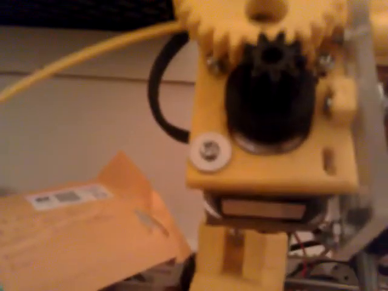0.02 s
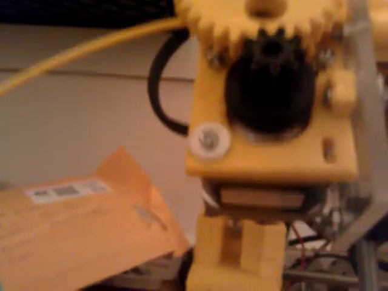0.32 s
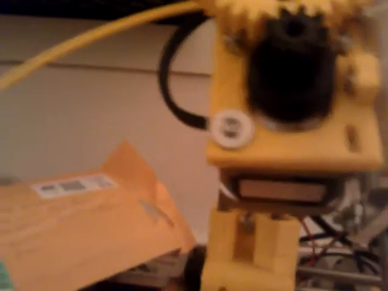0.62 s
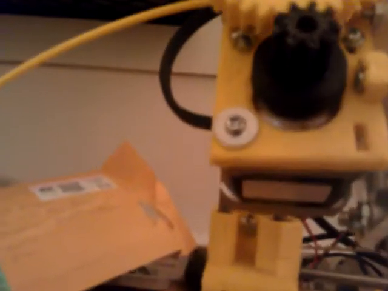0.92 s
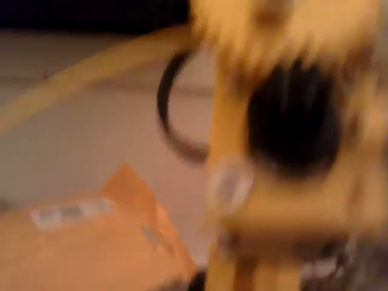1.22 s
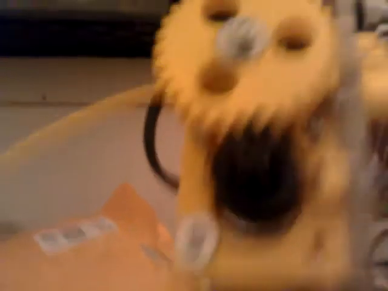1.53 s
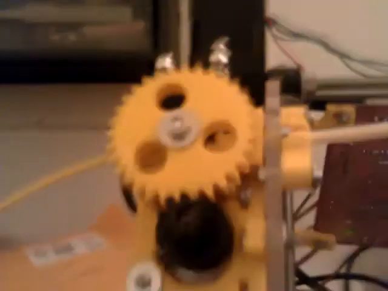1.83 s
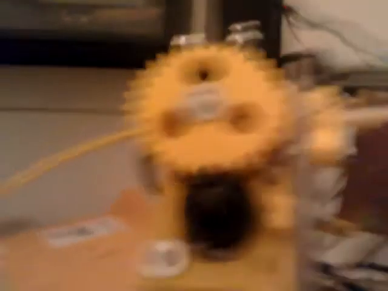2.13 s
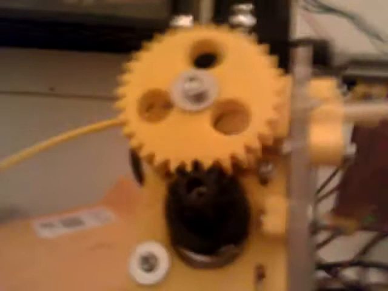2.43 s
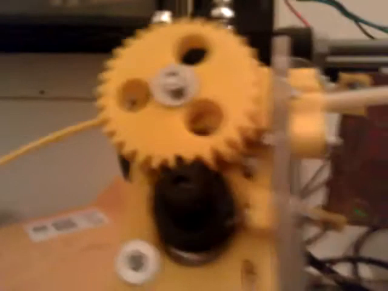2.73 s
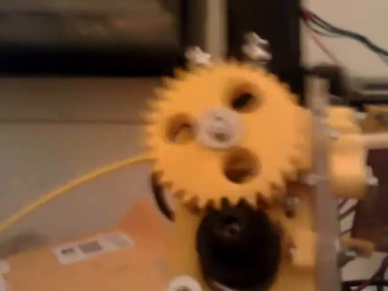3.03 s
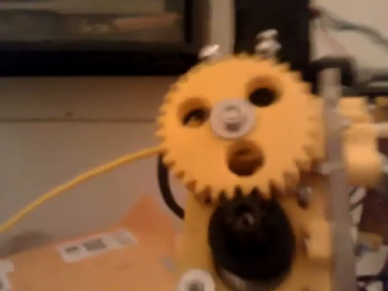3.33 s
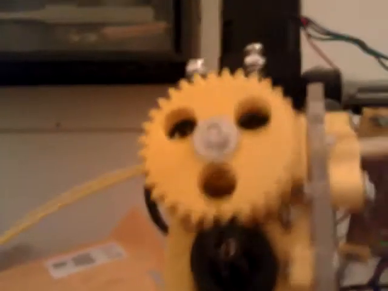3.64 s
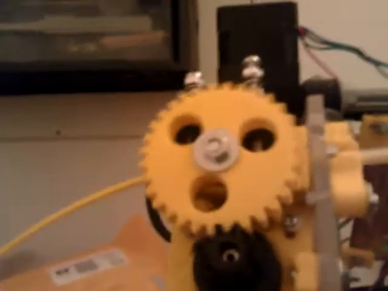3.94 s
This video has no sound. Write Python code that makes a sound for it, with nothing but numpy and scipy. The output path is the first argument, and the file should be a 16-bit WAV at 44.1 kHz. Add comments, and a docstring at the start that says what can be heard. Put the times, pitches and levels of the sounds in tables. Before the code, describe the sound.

A stepper motor hums, slowly turning plastic gears, with sharp clicks and scrapes from handling.

```python
"""A small room, one microphone close to a filament extruder, fan noise and a faint driver whine behind.
A stepper motor starts and slowly turns the printed plastic gears: every step rings the frame and ticks,
and the teeth rub as they mesh. Handling adds dry scrapes and sharp clicks; the hardest thump
and overload the microphone. Near the end it moves from beside the motor round to the big gear."""
import sys
import numpy as np
from scipy import signal
from scipy.fft import rfft, irfft
from scipy.io import wavfile
from scipy.ndimage import uniform_filter1d

SR = 44100
rng = np.random.default_rng(int(sys.argv[2]) if len(sys.argv) > 2 else 0)


def master_out(mix):
    """Clip the mix to full scale and print it as 16-bit PCM to the path in sys.argv[1]."""
    frames = np.transpose(np.atleast_2d(mix))
    ceiling = np.clip(frames, -1, 1)
    pcm = np.round(ceiling * 32767).astype(np.int16)
    wavfile.write(sys.argv[1], SR, pcm)


N = 176400
T = np.arange(N) / SR
MOTOR_START_S, STEPS_PER_S = .643, 39.135

# fan and room air: (frequency [Hz], level [dB])
AIR_COLOUR = [(30,-8),(80,-9),(150,-5.5),(300,19),(500,4),(900,3),(2000,-0.5),(4000,-2.5),(7000,-4),(10000,4),(12500,-10),(14000,-5),(16000,-13)]
# lines of the driver's whine: (frequency [Hz], width [Hz], level [dB], flutter [dB])
WHINE_LINES = [(8370,50,-13,3),(11720,14,-3,2),(11920,90,-3.5,5)]
# gain of the whine: (time [s], level [dB])
WHINE_GAIN = [(0,-53),(1.45,-58),(1.62,-43.5),(2.05,-47),(2.45,-55),(3.1,-59),(3.35,-49.5),(3.6,-49.5),(4.0,-52)]
# handling scrapes: (start [s], attack [s], hold [s], release [s], level [dB], centre [Hz], width [octaves])
SCRAPE_STROKES = [(0.233,0.022,0.021,0.068,-28,4240,0.41),(0.23,0.039,0.011,0.026,-32,2600,1.45),(0.248,0.012,0.015,0.054,-42,447,0.29),(0.449,0.013,0.049,0.014,-44.5,9460,1.3),(0.584,0.014,0.0058,0.013,-45,6750,0.87),(0.991,0.017,0.018,0.017,-40.5,5800,1.9),(1.111,0.005,0.041,0.036,-41.5,4700,0.62),(2.085,0.003,0.077,0.015,-25,10950,0.36),(2.088,0.0052,.05,.012,-39,6600,.25),(2.139,0.015,0.011,0.014,-23,4800,2.5),(2.183,0.011,0.0074,0.02,-22,9200,0.86),(2.28,0.019,0.058,0.022,-26,4670,2.7),(2.283,0.0077,0.021,.01,-30.5,10300,0.23),(2.32,0.012,0.03,0.0093,-19.5,11300,0.32)]
# high modes of the printed parts: (frequency [Hz], level [dB], t60 [s])
PART_MODES = [(1610,-5,.09),(3410,0,.12),(3690,0,.13),(4220,0,.15),(4770,0,.13),(5420,0,.1),(6050,-1,.11),(7850,-1,.12)]
# tail of the room: (frequency [Hz], level [dB])
ROOM_COLOUR = [(120,-4),(400,11.5),(900,2.5),(2000,4.5),(4000,11),(6000,8),(8500,3),(11000,-1),(16000,-19)]
# handling clicks: (time [s], level [dB], decay [s], tilt [dB/octave], room send [dB])
CLICK_EVENTS = [(0.635,-26.5,0.0057,4,-4),(1.114,-29,0.003,-5.5,-19),(1.354,-24.5,0.0018,6.5,-23),(1.635,-15.5,0.0039,-1,4.5),(1.6442,-9,0.0038,-1,-0.5),(1.647,-4.5,0.0049,0.5,-5.5),(1.835,-24.5,0.0068,-3.5,-25),(1.8532,-14.5,0.0038,-1.5,5.5),(1.8578,4,0.0023,1.5,-10),(2.046,-26.5,0.0078,-0.5,-10),(2.0848,-18,.002,12,-25),(2.159,-8.5,0.0018,1,-4),(2.1661,-1.5,0.0019,-0.5,-4),(2.284,-13.5,0.0016,3,-20),(2.3262,-5,0.0011,-5,-21),(2.344,5,0.0006,2.5,-21),(2.3493,0,0.0017,7.5,-22),(2.3562,2,0.0013,-15,-24),(2.4,-32,0.0086,-3,-44),(2.487,-11.5,0.0022,2.5,-1),(2.7242,-24.5,0.015,-7,-16),(2.7376,-19,0.004,7,-8),(2.749,-3,0.003,-0.5,-8.5),(2.926,-27.5,0.0066,-5.5,-22),(3.32,-29,0.007,10.5,-23),(3.581,-30.5,0.004,-15,-28)]
# crack of hard plastic: (frequency [Hz], level [dB])
CRACK_COLOUR = [(150,-6),(400,-0.5),(900,-2),(2000,-2.5),(3000,-4),(4200,1),(5500,-7.5),(8000,-8),(12000,-13.5),(16000,-12.5)]
# frame hum beside the motor and facing the big gear: (harmonic [x step rate], level [dB])
HUM_AT_MOTOR = [(1, -81), (2, -56), (3, -66), (4, -29), (5, -21.5), (6, -24.5), (7, -2), (8, -6), (9, -9),
                (10, -16.5), (11, -24.5), (12, -18), (13, -22.5), (14, -17.5), (15, -24.5), (16, -31),
                (17, -35), (18, -38), (19, -28.5), (20, -54), (21, -44.5), (22, -30)]
HUM_AT_GEAR = [(1, -54), (2, -68), (3, -42), (4, -43), (5, -19.5), (6, -21), (7, -6.5), (8, 1.5), (9, -6),
               (10, -18.5), (11, -29.5), (12, -11), (13, -16.5), (14, -24), (15, -19), (16, -30), (17, -27),
               (18, -47), (19, -27.5), (20, -59), (21, -79), (22, -29)]
# gains of the hum, step tick, motor case ring and motor hiss: (time [s], level [dB])
HUM_GAIN = [(.65,-35),(.78,-36),(.86,-32.5),(.93,-38),(1.1,-31),(1.18,-38),(1.3,-32),(1.5,-35.5),(1.6,-31),(1.7,-37.5),(1.78,-30.5),(1.9,-39.5),(2.06,-28.5),(2.22,-42),(2.46,-36.5),(2.85,-33.5),(3.17,-29),(3.28,-31.5),(3.37,-30.5),(3.47,-29.5),(3.53,-34),(3.63,-35),(3.77,-27.5),(3.86,-31),(3.92,-31.5),(4.0,-32.5)]
TICK_GAIN = [(.65,-47.5),(1.35,-36.5),(2.0,-32),(2.5,-49),(3.1,-45),(4.0,-42.5)]
CASE_GAIN = [(.65,-40),(1.35,-37.5),(2.0,-36),(2.5,-60)]
HISS_GAIN = [(.63,-52.5),(1.08,-50),(1.14,-48.5),(1.34,-43.5),(1.5,-49.5),(1.8,-40),(2.03,-42.5),(2.13,-52),(2.45,-79),(2.65,-58),(3.0,-64.5),(4.0,-59)]
# spectra of the step tick, motor case ring and motor hiss: (frequency [Hz], level [dB])
TICK_COLOUR = [(2500,-8),(3900,-14.5),(5000,5),(5800,-10),(6280,19.5),(6700,-4),(7600,9.5),(9000,-17),(15000,-12)]
CASE_COLOUR = [(3200,-25),(3850,-1.5),(4300,-13),(4950,1),(5400,-10.5),(5900,-28)]
HISS_COLOUR = [(1500,-4),(2600,2),(3700,12),(4900,10),(6300,12),(8000,4.5),(10000,3.5),(12500,5.5),(15500,-16)]
# rubs of meshing teeth: (time [s], half length [s], level [dB])
TOOTH_RUBS = [(0.642,0.011,-29),(0.693,0.036,-48.5),(0.887,0.025,-33),(1.118,0.0092,-31.5),(1.15,0.029,-32.5),(1.436,0.028,-36.5),(1.626,0.049,-36),(2.048,0.017,-36),(2.595,0.034,-36.5),(2.933,0.027,-32),(3.21,0.085,-43),(3.449,0.038,-36),(3.681,0.014,-30),(3.719,0.036,-31.5),(3.995,0.013,-23)]
# resonances of the gears: (frequency [Hz], level [dB], t60 [s])
GEAR_RESONANCES = [(273,3,0.042),(353,6,0.024),(540,5,0.051),(564,1,0.059),(679,-8,0.085),(857,-4.5,0.041),(1055,-16,0.033),(1340,-14,0.03)]
# low thumps of the hardest clicks: (time [s], peak [dB], contact sharpness [Hz])
THUMP_EVENTS = [(1.6488,-8.5,554),(1.859,-3,445),(2.166,-0.5,330),(2.3261,-6.5,447),(2.3573,5,1210),(2.4885,-1,480),(2.7414,-18,403),(2.7495,0,390)]


def from_db(db):
    """Decibels to gain."""
    return 10 ** (np.asarray(db) / 20)


def unit_rms(x):
    """Scale to unit rms."""
    return x / np.sqrt(np.mean(x ** 2) + 1e-20)


def fader(points):
    """Gain through (time [s], level [dB]) points."""
    return from_db(np.interp(T, *np.transpose(points)))


def octaves(size):
    """Frequency bins in octaves above 1 Hz."""
    return np.log2(np.maximum(np.arange(size // 2 + 1) * SR / size, 1))


def noise(points, tilt_db=0, size=N):
    """Unit noise coloured by (frequency [Hz], level [dB]) points and a tilt per octave."""
    hz, db = np.transpose(points)
    bins = octaves(size)
    gain = from_db(np.interp(bins, np.log2(hz), db) + tilt_db * np.maximum(bins, np.log2(hz[0])))
    return unit_rms(irfft(rfft(rng.standard_normal(size)) * gain, size))


def drift(per_s):
    """Random wander of unit rms, with per_s turning points a second."""
    return unit_rms(np.interp(T * per_s, np.arange(8000), rng.standard_normal(8000)))


def ring(x, hz, t60):
    """A resonance; a unit click rings at height 1."""
    radius, angle = from_db(-60 / (t60 * SR)), 2 * np.pi * hz / SR
    return signal.lfilter([0, np.sin(angle)], [1, -2 * radius * np.cos(angle), radius ** 2], x + 1e-18)


def butter(x, order, hz, kind):
    """Low-pass or high-pass filter."""
    return signal.sosfilt(signal.butter(order, hz, kind, fs=SR, output="sos"), x)


def add(out, start_s, x):
    """Mix a sound in at its start time."""
    i = int(start_s * SR)
    out[i:i + len(x)] += x[:N - i]


def running():
    """0 at rest, 1 once the motor turns."""
    return np.clip((T - MOTOR_START_S) / .0017, 0, 1)


def room_air(level_db=-52):
    """A steady bed of fan noise and room air."""
    return from_db(level_db) * noise(AIR_COLOUR)


def driver_whine(swell_db=2):
    """The motor driver gives off narrow lines that flutter and swell on every step."""
    lines = np.zeros(N)
    for hz, width, db, flutter_db in WHINE_LINES:
        line = ring(rng.standard_normal(N), hz, t60=np.log(1000) / (np.pi * width))
        lines += from_db(db) * unit_rms(line * from_db(flutter_db * drift(70)))
    pulse = running() * np.cos(2 * np.pi * STEPS_PER_S * (T - MOTOR_START_S))
    return lines * fader(WHINE_GAIN) * from_db(swell_db * pulse)


def scrapes(grain_db=1.5, rasp_db=1.1):
    """Handling makes brief grainy friction, each stroke in its own band."""
    out, t = np.zeros(N), T[:16384]
    for start, attack, hold, release, db, hz, width in SCRAPE_STROKES:
        band = 1 / (1 + np.abs((octaves(len(t)) - np.log2(hz)) / width) ** 2.3)
        friction = unit_rms(irfft(rfft(rng.standard_normal(len(t))) * band))
        rise = np.minimum(t / attack, 1)
        fall = np.exp(-(np.maximum(t - attack - hold, 0) / release) ** 2)
        add(out, start, from_db(db) * friction * rise * fall)
    roughness = from_db(grain_db * drift(600) + rasp_db * drift(230))
    return butter(out * roughness, 4, 13900, "lowpass")


def crackle(friction, slips_per_s=350, relative_db=-18):
    """A scrape catches in tiny slips, as strong as the friction is at that moment."""
    force = np.sqrt(np.abs(uniform_filter1d(friction ** 2, size=256)))
    slips = (rng.random(N) < slips_per_s / SR) * rng.uniform(.17, 1, N) * rng.choice([-1, 1], N)
    return force * unit_rms(ring(slips, hz=4970, t60=.0014)) * from_db(relative_db)


def plastic_ring(contacts, gain_db=-18):
    """The high modes of the printed parts ring on after a contact."""
    return sum((-1) ** k * from_db(db + gain_db) * ring(contacts, hz, t60) / np.sqrt(t60 * SR)
               for k, (hz, db, t60) in enumerate(PART_MODES))


def room_tail(send, t60=.21, delay_s=.00081, gain_db=-3.5, flicker_db=2):
    """Sound energy builds up in the small room and dies away as a diffuse tail."""
    retained = from_db(-120 / (t60 * SR))  # share of the energy left after one sample
    energy = signal.lfilter([1 - retained], [1, -retained], send ** 2 + 1e-18)
    envelope = np.sqrt(np.interp(T - delay_s, T, energy))
    return envelope * noise(ROOM_COLOUR) * from_db(gain_db + flicker_db * drift(350))


def clicks(rise_s=.00033, snap_hz=6450, snap_db=7.5):
    """Hard plastic cracks, its treble dying first; returns the direct sound and the room send."""
    direct, send, t = np.zeros(N), np.zeros(N), T[:4096]
    for start, db, decay, tilt_db, room_db in CLICK_EVENTS:
        grit = noise(CRACK_COLOUR, tilt_db, size=len(t))
        body = irfft(rfft(grit) / (1 + (2 ** octaves(len(t)) / snap_hz) ** 4))
        snap = from_db(snap_db) * (grit - body)
        crack = body * np.exp(-t / decay) + snap * np.exp(-t / (.4 * decay))
        crack *= from_db(db) * (1 - np.exp(-t / rise_s))
        add(direct, start, crack)
        add(send, start, crack * from_db(room_db))
    return butter(direct, 2, 330, "highpass"), send


def struck_harmonics(harmonics):
    """Complex strengths of the harmonics of a body that rings after each pulse (minimum phase)."""
    log_gain = np.log(from_db([harmonics[0][1]] + [db for _, db in harmonics]))
    mirrored = np.r_[log_gain, log_gain[:0:-1]]
    return np.exp(np.conj(signal.hilbert(mirrored)))[1:len(log_gain)]


def frame_hum(mic_move_s=(2.77, 3.29), jitter_s=.00008, wander_db=1.1, uneven_db=.9):
    """The steps ring the frame; the colour changes as the microphone moves round to the big gear."""
    toward_gear = np.interp(T, mic_move_s, [0, 1])
    step_cycle = np.exp(2j * np.pi * STEPS_PER_S * (T - MOTOR_START_S + jitter_s * drift(36)))
    out, harmonic = np.zeros(N), 1
    for at_motor, at_gear in zip(struck_harmonics(HUM_AT_MOTOR), struck_harmonics(HUM_AT_GEAR)):
        harmonic = harmonic * step_cycle  # next multiple of the step rate
        strength = at_motor + (at_gear - at_motor) * toward_gear
        roughness = 1 + .16 * (drift(STEPS_PER_S) + 1j * drift(STEPS_PER_S))
        out += (strength * harmonic * roughness).real * from_db(wander_db * drift(9))
    return np.sqrt(2) * out * fader(HUM_GAIN) * from_db(uneven_db * drift(STEPS_PER_S)) * running()


def motor_ticks_and_hiss(lag_s=.0034, decay_s=.0022, between_s=.016, between_db=-4.5):
    """A bright tick on each step and a weaker one between, over hiss; from beside, the case rings too."""
    def pulses(delay_s):
        return np.exp(-((T - MOTOR_START_S - delay_s) % (1 / STEPS_PER_S)) / decay_s)
    envelope = pulses(lag_s) + from_db(between_db) * pulses(lag_s + between_s)
    tick = noise(TICK_COLOUR) * fader(TICK_GAIN)
    case = noise(CASE_COLOUR) * fader(CASE_GAIN)
    hiss = noise(HISS_COLOUR) * fader(HISS_GAIN)
    return running() * (envelope * (tick + case) + hiss)


def gear_teeth(slips_per_s=890, steady_db=-48.5):
    """Rubbing teeth send dense small slips into the resonances of the gears."""
    rubs = sum(from_db(db) * np.exp(-.5 * ((T - time) / half) ** 2) for time, half, db in TOOTH_RUBS)
    force = from_db(steady_db) * running() + rubs
    slips = (rng.random(N) < slips_per_s / SR) * rng.standard_normal(N)
    gears = sum((-1) ** k * from_db(db) * ring(slips, hz, t60)
                for k, (hz, db, t60) in enumerate(GEAR_RESONANCES))
    return force * running() * unit_rms(gears)


def thumps(bass_cut_hz=231):
    """A hard click gives a short low thump through the microphone's bass cut; softer contact is duller."""
    out = np.zeros(N)
    for start, db, contact_hz in THUMP_EVENTS:
        push = butter(signal.unit_impulse(4096), 2, contact_hz, "lowpass")
        knock = butter(push, 4, bass_cut_hz, "highpass")
        add(out, start, from_db(db) * knock / np.abs(knock).max())
    return out


def scene(scrape_send_db=-27):
    """Motor, gears and handling close up, over the air of the room, in mono."""
    cracks, click_send = clicks()
    friction = scrapes()
    catches = crackle(friction)
    machine = frame_hum() + motor_ticks_and_hiss() + driver_whine() + gear_teeth()
    handling = cracks + thumps() + friction + catches + plastic_ring(cracks + catches)
    tail = room_tail(click_send + from_db(scrape_send_db) * friction)
    return (machine + handling + tail + room_air())[None]


def record(dry, low_cut_hz=99.5, overload=.72, top_hz=15800):
    """The small microphone loses the bass and rounds off the peaks; the top is cut."""
    thin = butter(dry, 3, low_cut_hz, "highpass")
    rounded = overload * np.tanh(thin / overload)
    return signal.sosfiltfilt(signal.ellip(8, .05, 50, top_hz, fs=SR, output="sos"), rounded)


dry = scene()
out = record(dry)
master_out(out)
```